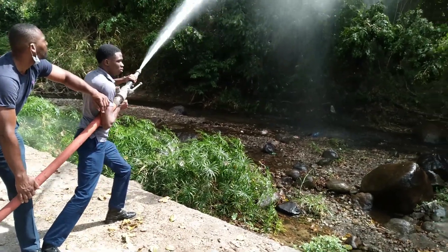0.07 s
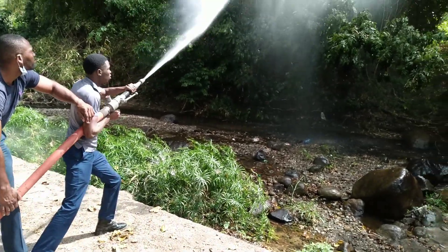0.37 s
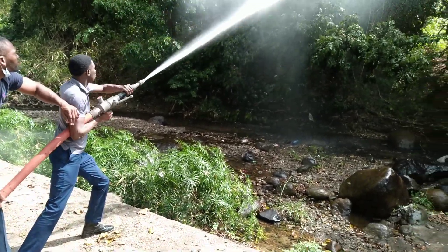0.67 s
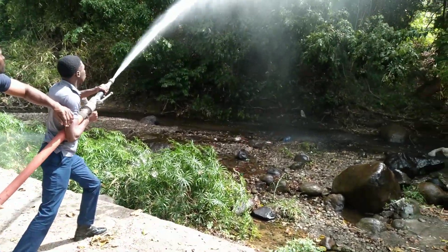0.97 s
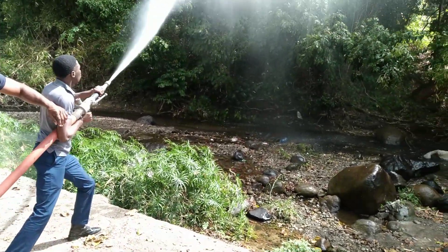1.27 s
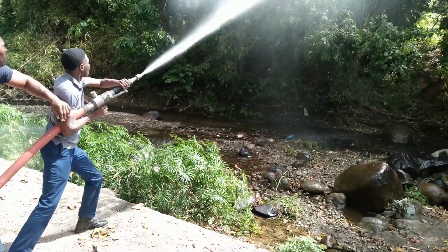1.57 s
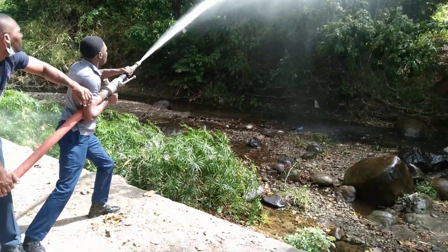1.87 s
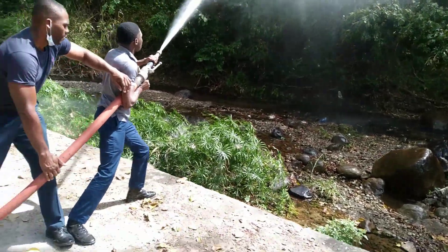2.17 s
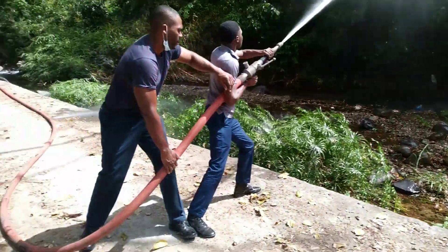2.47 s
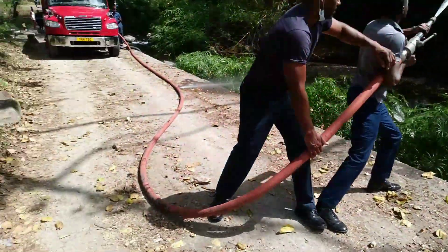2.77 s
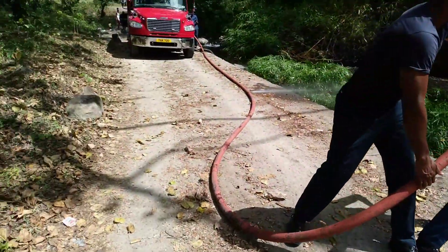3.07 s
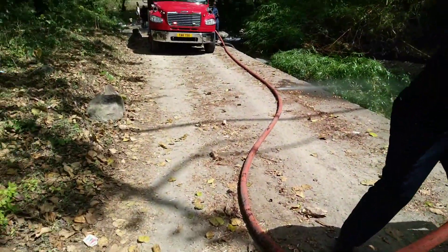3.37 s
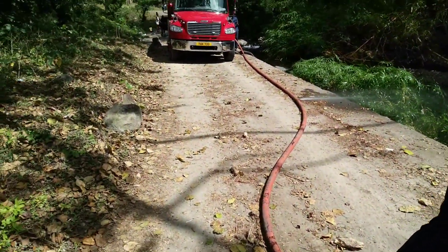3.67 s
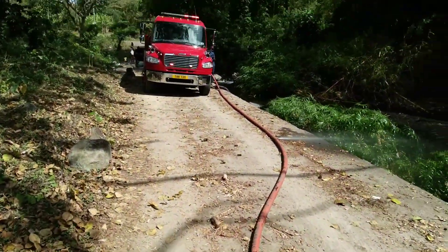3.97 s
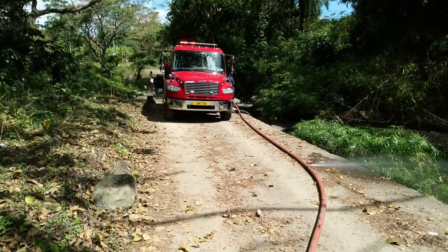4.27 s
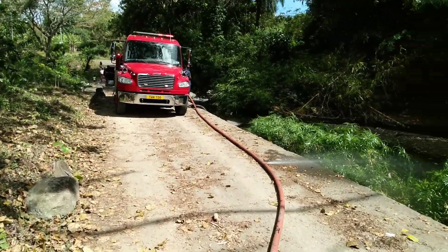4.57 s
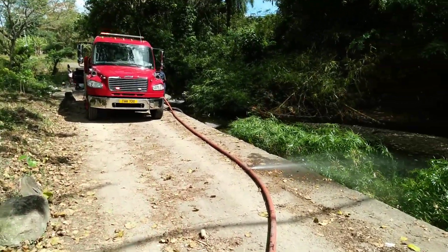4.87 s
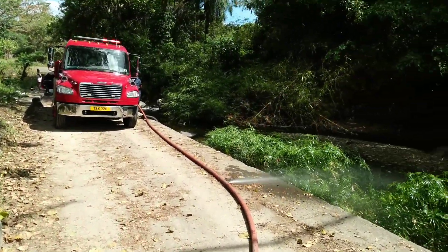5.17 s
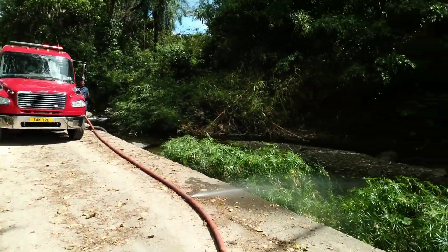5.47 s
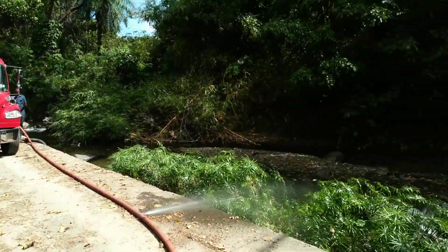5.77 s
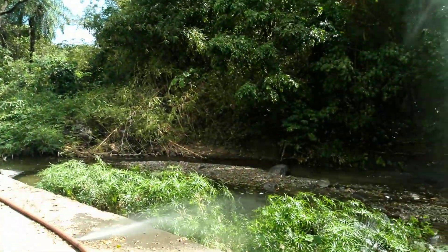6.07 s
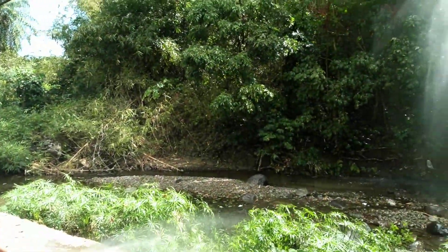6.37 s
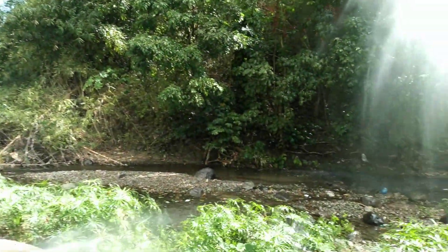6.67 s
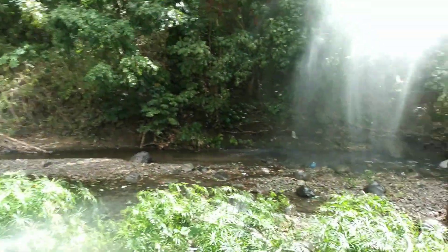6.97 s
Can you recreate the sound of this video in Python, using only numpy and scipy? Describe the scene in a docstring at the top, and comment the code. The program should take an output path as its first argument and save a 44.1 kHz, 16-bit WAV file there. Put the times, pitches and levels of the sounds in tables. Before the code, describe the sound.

Water rushes and spits from a fire hose over the steady low drone and clatter of a truck's diesel engine.

```python
"""A fire engine's six-cylinder diesel, down a river road, drives its pump at a fast idle: the exhaust
drones, combustion knocks and valves tick. Close by, a hose throws a jet over the river; air pockets spit
in the nozzle, drops patter down and a pinhole leak hisses. The stereo microphone is hand-held: it turns
from the nozzle to the engine and on to the water, and a shoe scuffs the road once on the way."""
import sys
import numpy as np
from scipy import signal
from scipy.fft import rfft, irfft, next_fast_len
from scipy.io import wavfile
from scipy.ndimage import map_coordinates

SR = 44100
rng = np.random.default_rng(int(sys.argv[2]) if len(sys.argv) > 2 else 0)


def output_pcm(signal):
    """Save a mono or channel-first signal as 16-bit PCM at the path in sys.argv[1].

    Samples are clipped to [-1, 1] before scaling.
    """
    pcm = np.clip(np.atleast_2d(signal).T, -1, 1) * 32767
    wavfile.write(sys.argv[1], SR, np.round(pcm).astype(np.int16))


N = 318402
T = np.arange(N) / SR

# the walk past the nozzle: (time [s], engine off axis [deg], nozzle off axis [deg])
BEARINGS = [(0, 47.3, 18), (2.2, 47, 11), (2.95, 12, -35), (4.3, 4.7, -79), (5.6, 32.5, -102),
            (6.4, 48, -122), (7.22, 92, -138)]
# echo off the recordist's chest, latest when facing the engine: (time [s], delay [ms])
CHEST_ECHO_DELAY = [(0, .88), (2.2, .9), (3.2, 1.3), (3.8, 1.39), (4.3, 1.35), (4.7, 1.23), (5.4, 1.22),
                    (6.2, .93), (7.22, .74)]
# cavity resonances of each microphone port: (frequency [Hz], gain [dB])
LEFT_RESPONSE = [(1000, 2), (2600, 5), (4500, 4.5), (6000, 2.5), (7300, 8.5), (8100, 1.5), (9000, -2.5),
                 (10500, -12), (15000, -12.5)]
RIGHT_RESPONSE = [(1000, 1), (3000, 6.5), (4400, 7), (6000, -1.5), (8000, -1.5), (9200, 3.5), (10500, 8),
                  (12000, 1.5), (13500, -6.5), (15000, -19)]

# a shoe on the road: (time [s], level [dB])
SCUFFS = [(3.647, -24)]
# its dull thud: (frequency [Hz], level [dB])
SCUFF_SPECTRUM = [(150, -18), (300, -1), (450, -9), (600, -14), (1200, -33), (4000, -42)]
# leak, sizzle, jet, fine spray and nozzle crackle: (frequency [Hz], level [dB])
LEAK_SPECTRUM = [(3000, -23), (5500, -29), (7000, -31), (8200, -9), (10500, 7), (12000, -3), (15000, -14)]
SIZZLE_SPECTRUM = [(1000, -30), (2400, -23), (3000, 5), (4200, 3.5), (5500, -7), (9000, -11)]
JET_SPECTRUM = [(100, -27), (300, -10.5), (500, 7.5), (750, 0.5), (1100, -1.5), (1500, -1.5), (1850, -2),
                (2400, 0), (3200, -3), (4200, -3), (5200, -5), (7000, -8.5), (14000, -17.5)]
SPRAY_SPECTRUM = [(1200, -17), (3000, -12.5), (5000, 4), (6500, 6), (8000, 5.5), (10000, -3.5), (12000, -4),
                  (15000, 1)]
SPIT_SPECTRUM = [(300, 9.5), (800, 4), (1400, 8.5), (2300, 10.5), (4500, 7.5), (7000, 6.5), (9000, -2.5),
                 (12000, -2.5), (15000, 0)]
# the jet sizzles up as the nozzle swings: (middle [s], length [s], level [dB])
SIZZLES = [(2.715, 0.51, -39.5), (5.303, 0.67, -39.5)]
# the spray grows as the microphone comes out from behind the hose crew: (time [s], level [dB])
SPRAY_LEVEL = [(0, -40.5), (2.1, -40), (2.8, -36.5), (4.5, -38.5), (5.6, -35), (7.22, -32.5)]
# air bursting from the nozzle: (time [s], level before filtering [dB], length [s], lower band edge [Hz])
AIR_POCKETS = [(0.0632, -17, 0.001, 2600), (0.071, -29.5, 0.016, 1500), (0.314, -31, 0.012, 2000),
               (0.753, -31.5, 0.025, 2500), (1.287, -22.5, 0.0042, 1400), (1.466, -16.5, 0.013, 380),
               (1.47, -23, 0.0084, 4000), (1.482, -10.5, 0.01, 4500), (2.116, -30.5, 0.028, 1800),
               (3.03, -27.5, 0.01, 3000), (3.443, -24, 0.0092, 1500), (4.089, -25, 0.027, 7350),
               (5.623, -21, 0.0096, 6000), (5.674, -25, 0.0066, 5000), (5.703, -23.5, 0.0091, 5000),
               (6.402, -19, 0.014, 7500), (6.416, -21, 0.013, 2200), (7.06, -22, .012, 5000),
               (7.096, -27, .007, 2500), (7.156, -27.5, 0.022, 2500), (7.186, -26.5, 0.038, 2000)]

# the engine settles to a fast idle: (time [s], firing rate [Hz])
FIRING_RATE = [(0, 67.4), (.65, 66.08), (3, 66.2), (7.22, 66.02)]
# cylinders in firing order: (knock delay [firing intervals], knock level [dB], tick level [dB])
CYLINDER_BLOWS = [(.8, -3, .5), (.76, 3, -2), (.8, -.5, 2), (.68, 1.5, 1), (.8, -1.5, -1.5), (.7, 1.5, .5)]
# tones of the exhaust and of the ringing block: (multiple of the six-firing cycle, level [dB])
EXHAUST_ORDERS = [(6, 0), (7, -30), (10, -38), (11, -37), (12, -17), (13, -35), (14, -35), (16, -30),
                  (18, -24.7), (21, -34.5), (24, -35), (30, -42), (36, -35.5)]
BLOCK_ORDERS = [(63, -3), (67, -5), (69, -2), (72, -7), (75, 1), (84, -1), (90, 1), (93, -2), (99, 2),
                (103, 2), (106, -1), (110, -3), (114, -5), (130, -3)]
# the drone swells along the road: (time [s], level [dB])
DRONE_LEVEL = [(0.1, -17.5), (1.31, -15), (1.48, -16), (4.82, -11.5), (6.96, -14), (7.1, -14)]
# the clatter opens up as the microphone faces the engine: (time [s], knock level [dB], tick level [dB])
CLATTER_LEVELS = [(0, -43, -53), (2.1, -42.5, -50), (2.8, -37.5, -54), (3.5, -37, -43), (4.4, -36.5, -43.5),
                  (4.65, -37, -43), (5, -36, -43), (5.4, -37, -40), (6.2, -39.5, -46), (7.22, -39.5, -49)]
# block and panels, valve gear, and the knock off the far bank: (frequency [Hz], level [dB])
KNOCK_SPECTRUM = [(200, -6), (300, -1), (395, -7), (470, -16), (560, -7), (640, -16), (730, 2), (870, -2.5),
                  (980, 8), (1140, 10), (1290, 3), (1450, -6), (1800, -5), (2300, -12.5), (5000, -25)]
TICK_SPECTRUM = [(1500, -15), (2200, 26), (2550, -5), (3400, 21), (4100, -7), (5500, 7), (9000, -1)]
BANK_SPECTRUM = [(600, -9), (850, -8), (970, -4), (1120, -15), (1500, -22.5)]
# exhaust turbulence and pump rumble: (frequency [Hz], level [dB])
RUMBLE_SPECTRUM = [(15, -14), (40, -6), (70, -1), (150, -10.5), (230, -10), (300, -5), (400, -9.5),
                   (600, -15.5), (1200, -25)]


def from_db(db):
    return np.exp(np.asarray(db) * (np.log(10) / 20))


def unit_rms(x):
    return x / np.sqrt(np.mean(x ** 2) + 1e-20)


def in_time(rows):
    """Each column of a timed table at every sample."""
    times, *columns = np.transpose(rows)
    return [np.interp(T, times, column) for column in columns]


def colour(x, spectrum, keep_power=True):
    """Shape x by a spectrum; by default white noise keeps its power."""
    size = next_fast_len(N + 4096)
    hz, level_db = np.transpose(spectrum)
    gain = from_db(np.interp(np.log(np.fft.rfftfreq(size, 1 / SR) + 1), np.log(hz), level_db))
    return irfft(rfft(x, size) * (unit_rms(gain) if keep_power else gain), size)[..., :N]


def drift(rate_hz):
    """Slow random wander of unit RMS."""
    hop, settle = 40, 2000
    pole = np.exp(-2 * np.pi * rate_hz * hop / SR)
    noise = rng.standard_normal(N // hop + settle + 2)
    slow = signal.lfilter([1], [1, -2 * pole, pole * pole], noise)[settle:]
    return np.interp(np.arange(N) / hop, np.arange(len(slow)), unit_rms(slow))


def grains(per_s, spread_db):
    """Clicks of uneven size at random moments."""
    born = rng.random(N) < per_s / SR
    sizes = from_db(spread_db * np.minimum(rng.exponential(1, N), 4))
    return unit_rms(sizes * rng.choice([-1, 1], N) * born)


def delayed(x, ms):
    return map_coordinates(x, [(T - ms / 1000) * SR], order=3)


def port_lag_ms(degrees, side_on_ms=.514):
    """How much later a sound from this bearing reaches the microphone's left port."""
    return side_on_ms * np.sin(np.radians(degrees))


def outdoors(x, lag_ms, scatter_db, t60):
    """Direct sound reaches the two ports with a lag; road, bank and trees scatter a short tail to each."""
    direct = np.array([delayed(x, side * lag_ms / 2) for side in (1, -1)])
    t = T[:SR // 2]
    tails = rng.standard_normal((2, len(t))) * from_db(-60 * t / t60)
    tails /= np.sqrt(np.sum(tails ** 2, axis=1, keepdims=True))
    scattered = signal.fftconvolve(x[None], tails, axes=1)[:, :N]
    return (direct + from_db(scatter_db) * scattered) / np.hypot(1, from_db(scatter_db))


def chest_echo(x, lag_ms, echo_db, dull_hz=4500):
    """The recordist's chest reflects: each port hears its own hollows, sliding as the microphone turns."""
    delay_ms, = in_time(CHEST_ECHO_DELAY)
    echo = np.array([delayed(port, delay_ms + side * lag_ms / 2) for port, side in zip(x, (-1, 1))])
    echo = signal.lfilter(*signal.butter(1, dull_hz, fs=SR), echo)
    return (x + from_db(echo_db) * echo) / np.hypot(1, from_db(echo_db))


def ground_bounce(x, delay_ms, sway_ms, echo_db):
    """The road sends the sound up again; the path changes as the nozzle sways, so the colour shifts."""
    return unit_rms(x + from_db(echo_db) * delayed(x, delay_ms + sway_ms * drift(.4)))


def shoe_scuff(decay_s=.009):
    """Underfoot, the short, dull thud of a sole on concrete."""
    push = sum(from_db(level_db) * (T > s) * np.exp(-np.abs(T - s) / decay_s) for s, level_db in SCUFFS)
    return push * colour(rng.standard_normal(N), SCUFF_SPECTRUM)


def leak(nearest_db=-44, nearest_s=7.3, approach_s=.88):
    """A pinhole in the hose hisses, louder as the microphone comes up to it."""
    nearness = 1 / np.hypot(1, (T - nearest_s) / approach_s)
    level = nearness * from_db(nearest_db + 1.9 * drift(5.2))
    return level * colour(rng.standard_normal((2, N)), LEAK_SPECTRUM)


def sizzle():
    """A dense sizzle of drops swells and sinks as the nozzle swings."""
    swell = sum(from_db(level_db) * np.exp(-(2 * (T - middle_s) / length_s) ** 4)
                for middle_s, length_s, level_db in SIZZLES)
    drops = np.array([grains(per_s=9000, spread_db=1.5) for port in range(2)])
    return swell * colour(drops, SIZZLE_SPECTRUM)


def nozzle_spits(lag_ms, rise_s=.0008, fall_s=.004, band_ratio=18):
    """Close by, air pockets burst out, each crackling in its own band: low and full, or thin and high."""
    crackle = colour(grains(per_s=16000, spread_db=1.2), SPIT_SPECTRUM)
    out = np.zeros(N)
    for start_s, level_db, length_s, edge_hz in AIR_POCKETS:
        span = slice(int(start_s * SR), int(start_s * SR) + SR // 10)
        t = T[span] - T[span][0]
        burst = np.minimum(t / rise_s, 1) * np.exp(-np.maximum(t - length_s, 0) / fall_s)
        band = signal.butter(1, [edge_hz, min(band_ratio * edge_hz, .45 * SR)], "band", fs=SR)
        out[span] += from_db(level_db) * signal.lfilter(*band, burst * crackle[span])
    return outdoors(out, lag_ms, scatter_db=-10, t60=.3)


def water_jet(degrees, side_loss_db=1.5):
    """The jet tears into drops with a fluttering rush; spray patters on leaves and stones all around."""
    spray_db, = in_time(SPRAY_LEVEL)
    jet_db = -40 + .33 * (spray_db - spray_db.mean())
    nozzle = colour(grains(per_s=14000, spread_db=2.5), JET_SPECTRUM)
    nozzle = ground_bounce(nozzle, delay_ms=2.5, sway_ms=.15, echo_db=-6)
    # the long plume is spread in space, so each port hears its own noise
    plume = from_db(4.5) * colour(rng.standard_normal((2, N)), JET_SPECTRUM)
    off_axis = from_db(-side_loss_db * (1 - np.cos(np.radians(degrees))))
    rush = off_axis * outdoors(nozzle, port_lag_ms(degrees), scatter_db=-4, t60=.32) + plume
    drops = np.array([grains(per_s=8000, spread_db=1.5) for port in range(2)])
    patter = colour(drops, SPRAY_SPECTRUM)
    return rush * from_db(jet_db + .8 * drift(10.4)) + patter * from_db(spray_db + .55 * drift(15))


def clatter(firings, strength_db, decay_s, sustain, repeat, uneven_db,
            rebound=0, rebound_s=.008, rise_s=.001):
    """Each firing sets off a dying rattle, which may rebound; the share `repeat` recurs every cycle."""
    number = np.arange(int(firings[-1]))
    cylinders = number % len(CYLINDER_BLOWS)
    knock_delay = np.array(CYLINDER_BLOWS)[cylinders, 0]
    starts = (np.interp(number + knock_delay, firings, T) * SR).astype(int)
    t = T[:SR // 32]
    blows = np.exp(-t / decay_s) + rebound * (t > rebound_s) * np.exp(-np.abs(t - rebound_s) / decay_s)
    envelope = (blows + sustain) * (1 - t / t[-1]) * (1 - np.exp(-t / rise_s))
    signatures = rng.standard_normal((len(CYLINDER_BLOWS), len(t)))
    out = np.zeros(N + len(t))
    for start, cylinder in zip(starts, cylinders):
        rattle = np.sqrt(repeat) * signatures[cylinder] + np.sqrt(1 - repeat) * rng.standard_normal(len(t))
        strength = from_db(strength_db[cylinder] + uneven_db * rng.standard_normal())
        out[start:start + len(t)] += strength * envelope * rattle
    return unit_rms(out[:N])


def bank_knock(firings, strength_db):
    """The hardest cylinder's woody knock comes back from the far bank, straight ahead, once a cycle."""
    hardest_only = np.where(strength_db == strength_db.max(), 0, -np.inf)
    knocks = clatter(firings, hardest_only, decay_s=.004, sustain=.05, repeat=.85, uneven_db=.5)
    return unit_rms(colour(knocks, BANK_SPECTRUM))


def pump(firings, turns_per_firing=1.531):
    """The geared pump shaft hums once a turn, unsteady under its load of water."""
    return np.cos(2 * np.pi * turns_per_firing * firings + .6 * drift(2)) * from_db(2 * drift(4))


def valve_gear(firings, strength_db, cover_hz=2900, width_hz=200, ring_db=7):
    """Sharp ticks, each ringing the valve cover."""
    ticks = clatter(firings, strength_db, decay_s=.003, sustain=.08, repeat=.4, uneven_db=.7)
    ring = signal.lfilter(*signal.iirpeak(cover_hz, cover_hz / width_hz, fs=SR), ticks)
    return unit_rms(colour(ticks, TICK_SPECTRUM) + from_db(ring_db) * unit_rms(ring))


def block_ring(firings, flutter_db=2.5):
    """The block rings on multiples of the cycle, wavering with the crankshaft; each tone flutters."""
    cycles = (firings + .004 * drift(4.6)) / len(CYLINDER_BLOWS)
    tones = 0
    for multiple, level_db in BLOCK_ORDERS:
        level = from_db(level_db + flutter_db * drift(1.7))
        tones += level * np.cos(2 * np.pi * (multiple * cycles + rng.random()))
    return unit_rms(tones)


def combustion_knock(firings, strength_db):
    """Each firing rattles block and panels and rebounds once, over the block's ringing."""
    rattle = clatter(firings, strength_db, decay_s=.0035, sustain=.14, repeat=.6, uneven_db=.3, rebound=.4)
    return colour(rattle, KNOCK_SPECTRUM) + from_db(-5.5) * block_ring(firings)


def exhaust(firings, flutter_per_db=2 / 30, wander_rad=.85):
    """Tones at the firing rate and its multiples; unequal cylinders add weak, wandering ones between."""
    drone_db, = in_time(DRONE_LEVEL)
    swell_db = drone_db - drone_db.mean()
    tones = 0
    for multiple, level_db in EXHAUST_ORDERS:
        overtone = multiple / len(CYLINDER_BLOWS)
        phase = 2 * np.pi * overtone * firings
        if multiple % len(CYLINDER_BLOWS):
            phase += rng.uniform(0, 2 * np.pi) + wander_rad * drift(8)
        # the weaker the tone, the more it flutters; the deepest swells most as the microphone moves
        flutter_db = flutter_per_db * level_db * drift(28)
        tones += from_db(level_db + flutter_db + swell_db / overtone) * np.cos(phase)
    return np.sqrt(2) * from_db(drone_db.mean()) * tones


def engine(lag_ms):
    """The diesel from down the road: drone, pump hum, knock and ticks on one crankshaft, over a rumble."""
    firings = .19 + np.cumsum(in_time(FIRING_RATE)[0]) / SR  # running count
    knock_db, tick_db = in_time(CLATTER_LEVELS)
    _, cylinder_knock_db, cylinder_tick_db = np.transpose(CYLINDER_BLOWS)
    drone = exhaust(firings) + from_db(-38.5) * pump(firings)
    rumble = from_db(-34) * colour(rng.standard_normal(N), RUMBLE_SPECTRUM)
    knock = from_db(knock_db) * combustion_knock(firings, cylinder_knock_db)
    ticks = from_db(tick_db) * valve_gear(firings, cylinder_tick_db)
    # long waves reach both ports alike, short ones are scattered on the way
    drone, rumble = (outdoors(low, lag_ms, scatter_db=-50, t60=.1) for low in (drone, rumble))
    knock = outdoors(knock, lag_ms, scatter_db=-14, t60=.17)
    far_bank = from_db(-45.5) * bank_knock(firings, cylinder_knock_db)
    ticks = outdoors(ticks, lag_ms, scatter_db=-4.5, t60=.15)
    return drone + chest_echo(rumble + knock, lag_ms, echo_db=-6) + far_bank + ticks


def scene():
    """Engine down the road, water close by, the microphone turning between them."""
    engine_degrees, nozzle_degrees = in_time(BEARINGS)
    engine_lag_ms = port_lag_ms(engine_degrees)
    spits = nozzle_spits(port_lag_ms(nozzle_degrees))
    water = chest_echo(water_jet(nozzle_degrees), engine_lag_ms, echo_db=-10)
    return engine(engine_lag_ms) + water + sizzle() + leak() + spits + shoe_scuff()


def record(dry, flat_below_hz=300, clip_at=.85, cutoff_hz=15400):
    """The microphone's two ports colour the treble, the highest peaks are clipped, the top is cut."""
    heard = np.array([colour(x, [(flat_below_hz, 0), *response], keep_power=False)
                      for x, response in zip(dry, (LEFT_RESPONSE, RIGHT_RESPONSE))])
    low_pass = signal.ellip(12, .1, 80, cutoff_hz, fs=SR, output="sos")
    return signal.sosfilt(low_pass, np.clip(heard, -clip_at, clip_at))


dry = scene()
out = record(dry)
output_pcm(out)
```